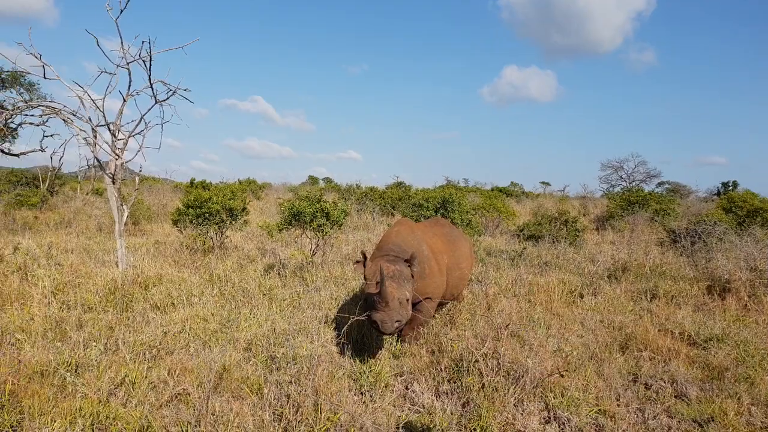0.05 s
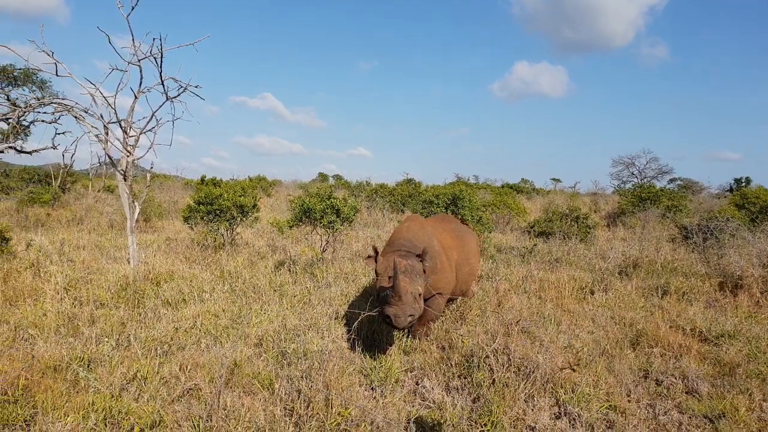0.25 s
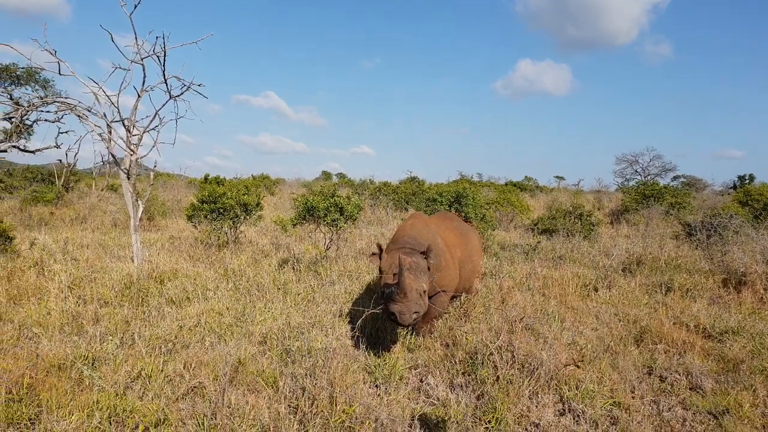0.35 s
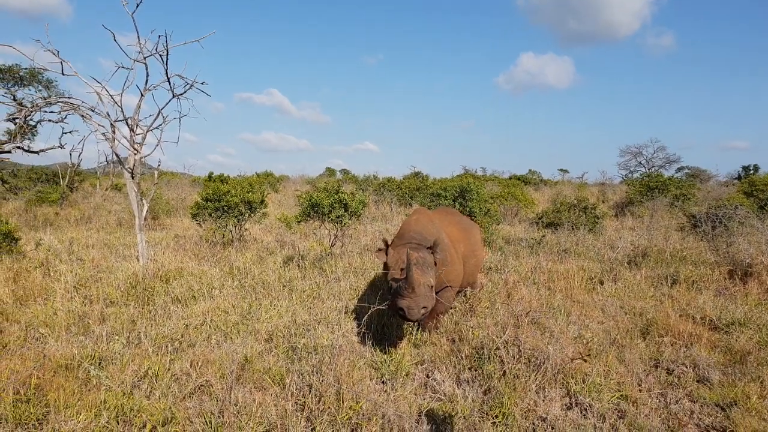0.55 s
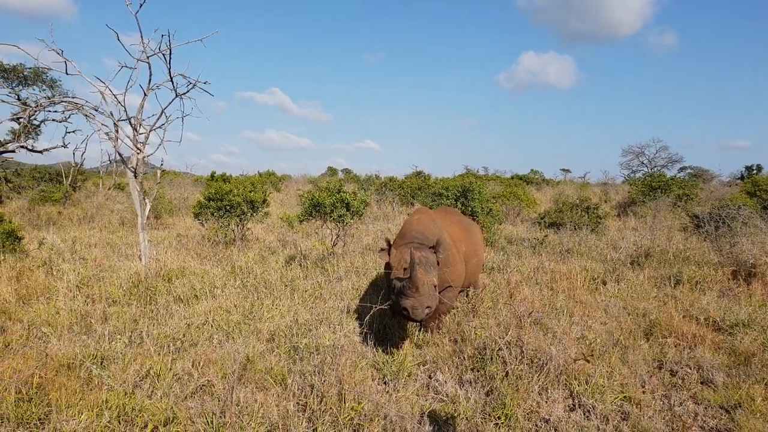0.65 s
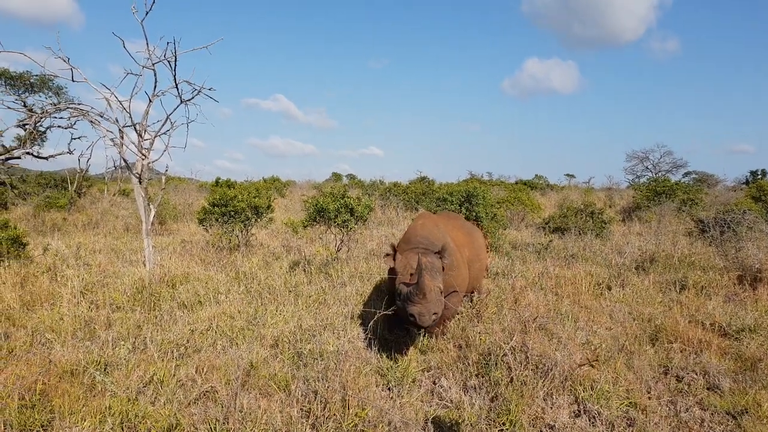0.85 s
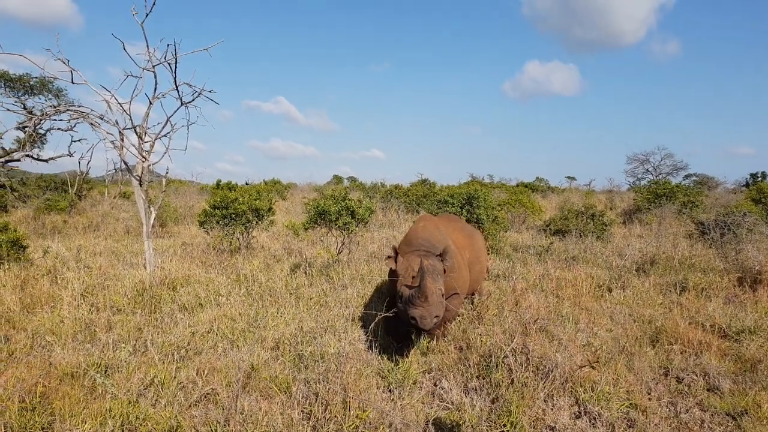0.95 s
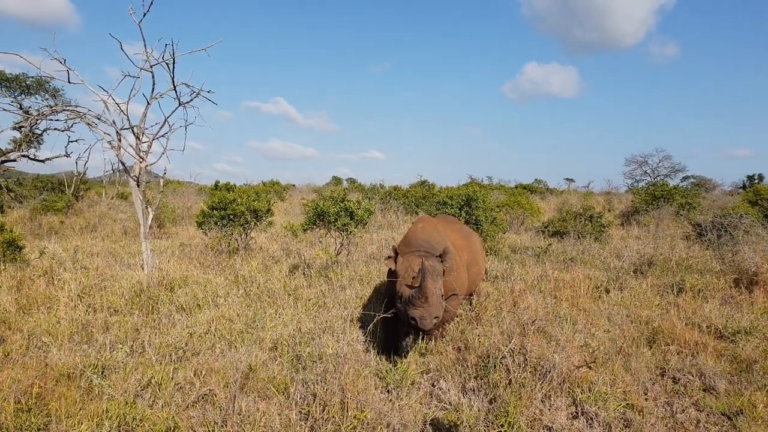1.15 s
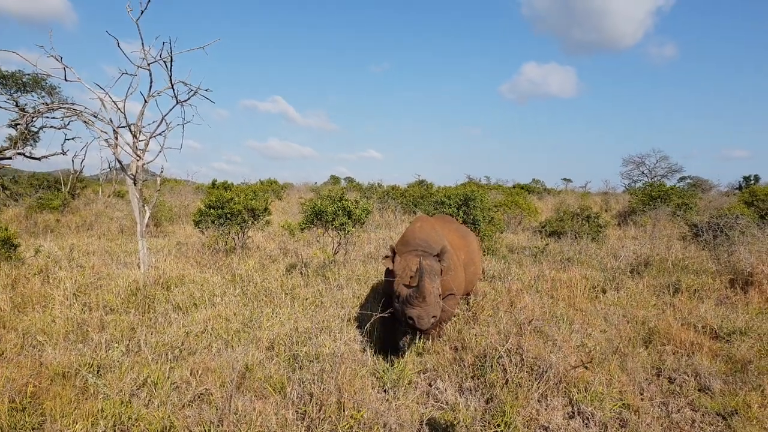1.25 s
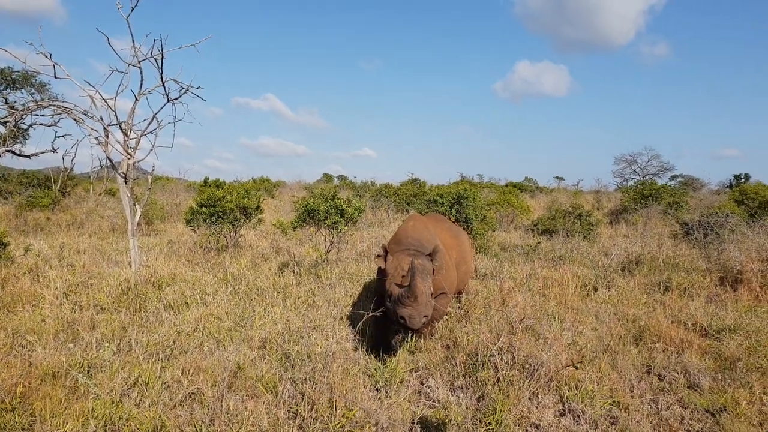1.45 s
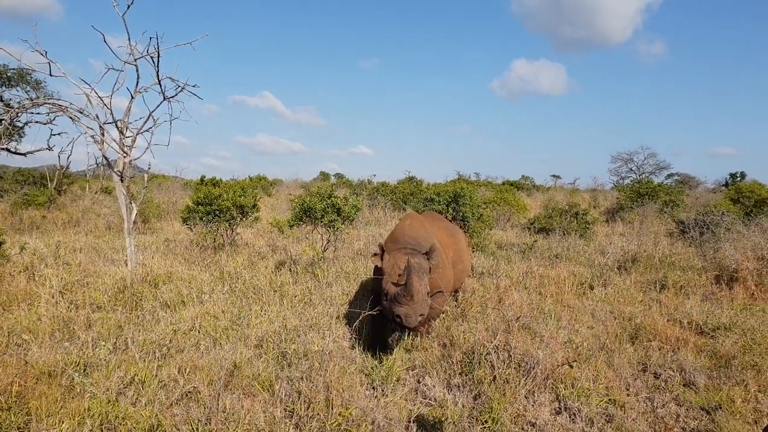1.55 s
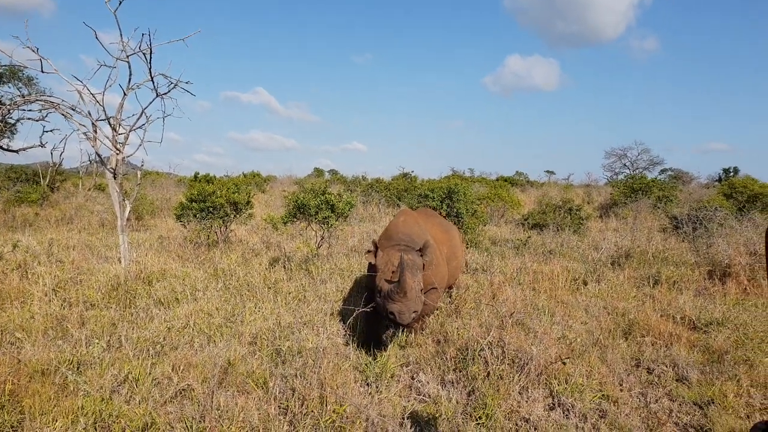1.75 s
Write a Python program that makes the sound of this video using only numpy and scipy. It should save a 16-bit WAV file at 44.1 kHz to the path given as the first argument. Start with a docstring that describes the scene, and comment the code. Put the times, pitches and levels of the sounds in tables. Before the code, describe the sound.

Light wind buffets the microphone, with small bird chirps and a swish of dry grass.

```python
"""Light wind buffets the two ports of a microphone in open grassland: eddies make a low rumble,
and one gust flutters in quick slaps on the right. Dry grass swishes in one long swell as a rhino
walks through it, over the far murmur of the wind. A small bird repeats a falling chirp; others add
a thin buzz, faint slurs and short whistled notes, all reflected by the bushes."""
import sys
import numpy as np
from scipy import signal
from scipy.fft import irfft
from scipy.io import wavfile
from scipy.ndimage import uniform_filter1d

SR = 44100
rng = np.random.default_rng(int(sys.argv[2]) if len(sys.argv) > 2 else 0)


def store_wav(level_fs):
    """Save 16-bit WAV to argv[1]."""
    pcm = np.round(np.clip(np.atleast_2d(level_fs), -1, 1) * 32767)
    wavfile.write(sys.argv[1], SR, pcm.T.astype(np.int16))


N = 79380
TIME = np.arange(N) / SR

# Spectra of still air and of far wind, low and high. Each row: frequency in Hz, relative level in dB.
AIR_SPECTRUM = [(1000, -8), (2200, -7.5), (3300, -15.5), (5000, -8.5), (7500, -14.5), (11000, -12.5),
                (15500, -12.5)]
MURMUR_SPECTRUM = [(60, -5), (300, -7), (480, 0), (680, -1), (950, -15), (1500, -19), (4000, -78)]
RUSH_SPECTRUM = [(400, -23.5), (750, -4.5), (1100, 1), (1400, -12), (1900, -22.5), (3000, -24), (6000, -38)]
# Strength of the far wind. Each row: time in seconds, murmur level in dB, rush level in dB.
FAR_WIND_LEVELS = [(0, -77, -71), (.17, -94, -67.5), (.32, -72.5, -76.5), (.6, -61.5, -71), (.8, -65, -69),
                   (.97, -62, -67.5), (1.22, -66, -62.5), (1.38, -66.5, -73.5), (1.5, -63.5, -66),
                   (1.63, -61, -63), (1.8, -62, -69.5)]
# Likeness of the far wind at the two ports. Each row: frequency in Hz, correlation.
FAR_WIND_CORRELATION = [(100, 1), (400, 0.6), (700, -0.16), (1100, -0.72), (1500, -0.064), (2000, -0.1)]

# Spectrum of many distant birds. Each row: frequency in Hz, relative level in dB.
CHORUS_SPECTRUM = [(1900, -30), (2350, -18.5), (2620, -1.5), (3100, -1.5), (3800, -6.5), (4600, -17),
                   (7000, -32)]
# Strength of that chorus. Each row: time in seconds, level in dB.
CHORUS_LEVELS = [(0, -67), (.3, -68), (.65, -71.5), (.95, -84), (1.4, -85.5), (1.8, -75.5)]
# Distant slurs. Each row: start and length in seconds, first and last pitch in Hz, level in dB.
BIRD_SLURS = [(0.462, 0.025, 3375, 2940, -63), (1.397, 0.078, 5980, 4040, -74.5),
              (1.681, 0.053, 3970, 3220, -70)]
# Whistled notes. Each row: start and length in seconds, first and last pitch in Hz, level in dB,
# left minus right in dB, phase lag on the right in radians.
BIRD_NOTES = [(.07, 0.021, 2855, 2850, -55, -6, -3.5), (.233, 0.012, 2950, 2570, -56, -9, -3.6),
              (0.255, 0.011, 2820, 2760, -49.5, -7, -3), (0.423, 0.017, 2960, 2810, -54.5, -5, -2),
              (0.445, 0.0218, 2760, 2698, -54.5, -9.5, -2.5), (.638, 0.02, 3570, 3590, -57.5, -1, 1.5),
              (1.474, 0.021, 2644, 2620, -64.5, -6, -1.5), (1.498, 0.043, 2620, 2583, -61.5, -8.5, -1.5)]
# Falling chirps. Each row: start in seconds, top pitch in Hz, level before the fade in dB.
BIRD_CHIRPS = [(0.019, 4100, -55.5), (.203, 4005, -52), (0.393, 3980, -52), (0.574, 3880, -58),
               (0.719, 3980, -52)]

# Spectra of the two bands of grass noise. Each row: frequency in Hz, relative level in dB.
GRASS_BODY_SPECTRUM = [(1000, -25), (1900, -30), (2400, -12.5), (3100, -3), (4000, -1), (4900, 0.5),
                       (6000, -2), (7300, -2.5), (8700, -11.5), (10000, -14), (13000, -24)]
GRASS_SIZZLE_SPECTRUM = [(6000, -34), (8800, -11.5), (9800, -6), (10800, 0.5), (12000, -0.5), (13500, -2),
                         (15700, -5)]
# Swell of the grass. Each row: time in seconds, relative levels of body and sizzle in dB.
GRASS_LEVELS = [(0, -63.5, -59.5), (.04, -64, -64.5), (.09, -70.5, -71), (.16, -74.5, -73),
                (.3, -67, -76.5), (.5, -74.5, -75.5), (.57, -68.5, -65.5), (.68, -60.5, -60.5),
                (.8, -57.5, -55.5), (.91, -53.5, -51), (.955, -48.5, -46.5), (1.01, -50.5, -50),
                (1.1, -56.5, -55.5), (1.25, -59, -57), (1.31, -65.5, -64.5), (1.37, -75, -72),
                (1.5, -77.5, -79), (1.8, -81.5, -100)]
# Arrival-time difference as the swish moves. Each row: time in seconds, left lead in microseconds.
GRASS_LEAD = [(0, 7), (.75, -11), (.97, -4), (1.2, 11.5), (1.8, 7)]
# Response of the ports to the grass. Each row: frequency in Hz, coherence,
# phase lag on the right in radians, left minus right in dB.
GRASS_PORT_RESPONSE = [(1970, 0.45, 0.5, 11), (3300, 0.37, 0.5, -1), (4380, 1, 1, -6),
                       (5880, 0.34, 0.5, -0.5), (7900, 1, 1.6, 4), (9600, 0.098, -0.4, 2),
                       (11000, 0.58, 1.2, 0), (11680, 0.86, 1.9, -6.5), (12240, 0.54, 4.5, -3),
                       (15500, 0.51, 4.5, 2)]

# Spectrum of the rumble at the ports. Each row: frequency in Hz, relative level in dB.
RUMBLE_SPECTRUM = [(15, -7), (40, -2), (75, -2.5), (130, -12.5), (220, -24.5), (400, -35.5), (1000, -70)]
# Strength of that rumble. Each row: time in seconds, left level in dB, right level in dB.
RUMBLE_LEVELS = [(0, -66, -66), (.13, -61.5, -63), (.3, -46.5, -49), (.55, -49, -63), (.72, -55.5, -50),
                 (.9, -62, -64.5), (1.2, -53, -62), (1.35, -68, -51), (1.5, -53.5, -48),
                 (1.8, -61.5, -54.5)]
# Eddies. Each row: centre and half-length in seconds, level in dB, roll-off in Hz, port (0 left, 1 right).
PORT_EDDIES = [(0.169, 0.015, -41, 85.5, 1), (0.221, 0.048, -40, 63, 1), (0.249, 0.062, -36, 51.4, 0),
               (0.313, 0.039, -43.5, 53.7, 0), (.345, 0.05, -29.5, 84.6, 1), (0.37, 0.045, -33.5, 62.6, 0),
               (.42, .07, -28, 134, 1), (0.437, 0.066, -34, 59.8, 0), (0.546, 0.054, -29.5, 156, 1),
               (.552, 0.029, -38, 68.2, 0), (0.626, 0.036, -36, 82.6, 0), (.622, .04, -23.5, 119, 1),
               (.662, 0.032, -32.5, 73, 1), (0.701, .04, -34, 78, 1), (.775, 0.049, -42, 56, 1),
               (1.119, 0.05, -44.5, 37, 0), (1.38, 0.036, -48.5, 48, 0), (1.479, 0.062, -41.5, 52.3, 0),
               (1.555, 0.039, -38.5, 95, 1), (1.683, 0.028, -37.5, 47.4, 0)]
# Slaps of air in the gust. Each row: time in seconds, peak in dB, half-width in seconds.
GUST_SLAPS = [(.345, -15, .0017), (0.3555, -16, 0.0021), (.366, -15.5, .0017), (0.4202, -15.5, 0.0012),
              (.429, -15.5, 0.0014), (.454, -15, 0.0011), (.461, -17.5, .0009), (0.4711, -13.5, 0.0014),
              (.485, -14, 0.0017), (0.5071, -14.5, .0013), (.512, -20.5, 0.0009), (0.522, -15, 0.0013),
              (0.5709, -19, 0.0026), (.583, -24, 0.0012), (0.5943, -15, 0.00079), (.606, -17, 0.00074),
              (0.638, -22, .0019)]


def amp(db):
    """Amplitude grows tenfold with every 20 dB."""
    return 10 ** (np.asarray(db) / 20)


def unit(x):
    """Division by the rms gives a signal unit power."""
    return x / np.sqrt(np.mean(x ** 2) + 1e-20)


def over_time(rows, t, column=1):
    """Linear interpolation gives a table's value at time t."""
    rows = np.array(rows, float)
    return np.interp(t, rows[:, 0], rows[:, column])


def over_hz(rows, hz, column=1):
    """Interpolation on a logarithmic axis gives a table's value at each frequency."""
    rows = np.array(rows, float)
    return np.interp(np.log(hz + 1), np.log(rows[:, 0] + 1), rows[:, column])


def add(mix, start, sound):
    """Superposition: a sound adds to the mix from its start in seconds."""
    part = mix[..., max(round(start * SR), 0):][..., :sound.shape[-1]]
    part += sound[..., :part.shape[-1]]


def noise(spectrum, size, correlation=None, modulate=None):
    """Random short-time spectra sum to coloured noise; a shared part correlates the two channels."""
    hz = np.fft.rfftfreq(size, 1 / SR)
    t = np.arange(N * 4 // size + 5) * size / 4 / SR
    draws = rng.standard_normal((4, len(t), len(hz)))
    left, unrelated = draws[:2] + 1j * draws[2:]
    shared = np.clip(over_hz(correlation, hz), -1, 1) if correlation else 0
    bins = np.array([left, shared * left + np.sqrt(1 - shared ** 2) * unrelated])
    if modulate:
        bins = modulate(bins, t, hz)
    bins *= amp(over_hz(spectrum, hz))
    return unit(signal.istft(bins.transpose(0, 2, 1), nperseg=size, noverlap=size * 3 // 4)[1][:, :N])


def far_wind():
    """Distant turbulence is broadband noise: a murmur and a higher rush over the hiss of still air."""
    murmur = noise(MURMUR_SPECTRUM, size=1024, correlation=FAR_WIND_CORRELATION)
    murmur *= amp(over_time(FAR_WIND_LEVELS, TIME, column=1))
    rush = noise(RUSH_SPECTRUM, size=1024, correlation=FAR_WIND_CORRELATION)
    rush *= amp(over_time(FAR_WIND_LEVELS, TIME, column=2))
    return murmur + rush + amp(-72.5) * noise(AIR_SPECTRUM, size=512)


def flutter(width_hz, count):
    """Random amplitude modulation spreads a tone into a band width_hz wide."""
    low_pass = signal.butter(2, width_hz / 2, fs=SR, output="sos")
    return unit(signal.sosfilt(low_pass, rng.standard_normal(SR)))[-count:]


def whistle(hz, db, pan_db=0, lag=0, waver=.012):
    """Phase is the integral of frequency: a wavering sine, lag radians later at the right port."""
    t = np.arange(len(hz)) / SR
    drift = unit(uniform_filter1d(rng.standard_normal(SR // 2), size=90))[:len(hz)]
    phase = 2 * np.pi * np.cumsum(hz * (1 + waver * drift)) / SR
    ramp = np.clip(np.minimum(t, t[-1] - t) / .0024, 0, 1)  # 2.4 ms at each end
    ports = np.array([amp(pan_db / 2) * np.sin(phase), amp(-pan_db / 2) * np.sin(phase - lag)])
    return amp(db) * np.sin(np.pi / 2 * ramp) ** 2 * ports


def buzz(length, start_hz, end_hz, db):
    """Modulation sidebands make a sinking note rasp; their band narrows as it fades."""
    progress = np.linspace(0, 1, round(length * SR))
    count = len(progress)
    rasp = (1 - progress) * flutter(900, count) + progress * flutter(250, count)
    rasp /= np.hypot(1 - progress, progress)  # constant power through the crossfade
    swell = np.sqrt(abs(np.sin(np.pi * progress))) * amp(-9 * progress ** 2)
    return whistle(np.linspace(start_hz, end_hz, count), db, pan_db=-6) * swell * rasp


def bush_reverberation(calls, t60_s=.16, build_s=.006):
    """Scattering by the bushes gives a diffuse tail that decays exponentially."""
    t = TIME[:SR // 2]
    tail = rng.standard_normal((2, len(t))) * amp(-60 * t / t60_s) * np.minimum(t / build_s, 1)
    return amp(-12) * signal.fftconvolve(calls, tail / np.linalg.norm(tail[0]), axes=1)[:, :N]


def birds():
    """Calls are frequency-modulated tones, heard directly and by reflection; distant ones blur to noise."""
    calls = np.zeros((2, N))
    progress = np.linspace(0, 1, round(.031 * SR))
    for start, top_hz, db in BIRD_CHIRPS:
        hz = top_hz * (1 - .262 * abs(progress - .269) ** 1.285)  # crests early, then falls
        add(calls, start, whistle(hz, db, lag=1.62) * amp(-7 * progress ** 2))
        add(calls, start + .062, whistle(hz, db - 15, waver=.05))  # echo from the bushes
    for start, length, start_hz, end_hz, db, pan_db, lag in BIRD_NOTES:
        hz = np.linspace(start_hz, end_hz, round(length * SR))
        add(calls, start, whistle(hz, db, pan_db, lag))
    for start, length, start_hz, end_hz, db in BIRD_SLURS:
        hz = np.linspace(start_hz, end_hz, round(length * SR))
        add(calls, start, whistle(hz, db) * flutter(width_hz=450, count=len(hz)))
    add(calls, .228, buzz(length=.25, start_hz=6970, end_hz=6130, db=-61))
    chorus = noise(CHORUS_SPECTRUM, size=512) * amp(over_time(CHORUS_LEVELS, TIME))
    return calls + bush_reverberation(calls) + chorus


def rustle(bins, t, hz, patch_db=.9, flicker_db=1.2):
    """Phase and level differences between the ports give direction; random gain roughens the hiss."""
    lead_s = over_time(GRASS_LEAD, t)[:, None] / 1e6
    lag = over_hz(GRASS_PORT_RESPONSE, hz, column=2) + 2 * np.pi * hz * lead_s
    pan = amp(over_hz(GRASS_PORT_RESPONSE, hz, column=3) / 2)
    ports = np.array([bins[0] * pan, bins[1] * np.exp(-1j * lag) / pan])
    patches = uniform_filter1d(rng.standard_normal((len(t), len(hz))), size=12, axis=0)
    patches = unit(uniform_filter1d(patches, size=4, axis=1))
    flicker = unit(uniform_filter1d(rng.standard_normal((len(t), 1)), size=3, axis=0))
    return ports * amp(patch_db * patches - flicker_db * flicker)


def grass():
    """Friction of countless dry stalks sums incoherently to a body of hiss and a finer sizzle."""
    body = noise(GRASS_BODY_SPECTRUM, size=256, correlation=GRASS_PORT_RESPONSE, modulate=rustle)
    body *= amp(1.5 + over_time(GRASS_LEVELS, TIME, column=1))
    sizzle = noise(GRASS_SIZZLE_SPECTRUM, size=256, correlation=GRASS_PORT_RESPONSE, modulate=rustle)
    sizzle *= amp(2.5 + over_time(GRASS_LEVELS, TIME, column=2))
    return body + sizzle


def eddy(half_length, db, roll_off_hz, low_cut_hz=82):
    """Turbulent pressure lies mainly at low frequencies: one lump of noise, weak above its roll-off."""
    t = np.arange(-half_length, half_length, 1 / SR)
    hz = np.fft.rfftfreq(SR // 2, 1 / SR)
    spectrum = np.exp(-(hz / roll_off_hz) ** 1.291) * hz ** 3 / np.hypot(hz ** 3, low_cut_hz ** 3)
    analytic = signal.hilbert(irfft(spectrum * np.exp(2j * np.pi * rng.random(len(hz)))))
    power = signal.fftconvolve(abs(analytic) ** 2, np.hanning(SR // 40), "same")
    swirl = analytic.real / np.sqrt(power)  # evened out, so the window shapes the lump
    window = np.cos(np.pi / 2 * t / half_length) ** 2
    return amp(db) * unit(swirl[SR // 20:][:len(t)] * window) * np.sqrt(np.mean(window ** 2))


def slap(db, half_width, low_cut_hz=96, top_hz=894):
    """A small vortex crossing the port gives a pressure pulse that swings over into suction."""
    t = np.arange(-.02, .04, 1 / SR)
    pulse = signal.windows.tukey(len(t)) / (1 + (t / half_width) ** 2)
    low_cut = signal.butter(3, low_cut_hz, "high", fs=SR, output="sos")
    rounding = signal.butter(3, top_hz, fs=SR, output="sos")
    pressure = signal.sosfilt(np.vstack([low_cut, rounding]), pulse)
    return amp(db) * pressure / abs(pressure).max()


def buffeting():
    """Turbulence is local: each port has its own rumble and eddies, and only the right is slapped."""
    levels_db = [over_time(RUMBLE_LEVELS, TIME, column) for column in (1, 2)]
    ports = noise(RUMBLE_SPECTRUM, size=4096) * amp(levels_db)
    for centre, half_length, db, roll_off_hz, port in PORT_EDDIES:
        add(ports[int(port)], centre - half_length, eddy(half_length, db, roll_off_hz))
    for centre, db, half_width in GUST_SLAPS:
        add(ports[1], centre - .02, slap(db, half_width))
    return ports


def scene():
    """The pressures of independent sources add linearly at each port."""
    return far_wind() + birds() + grass() + buffeting()


def record(dry):
    """A linear-phase low-pass filter limits the band to 15750 Hz."""
    low_pass = signal.firwin(1023, 15750, window=("kaiser", 9), fs=SR)
    return signal.oaconvolve(dry, low_pass[None], "same", axes=1)


dry = scene()
out = record(dry)
store_wav(out)
```